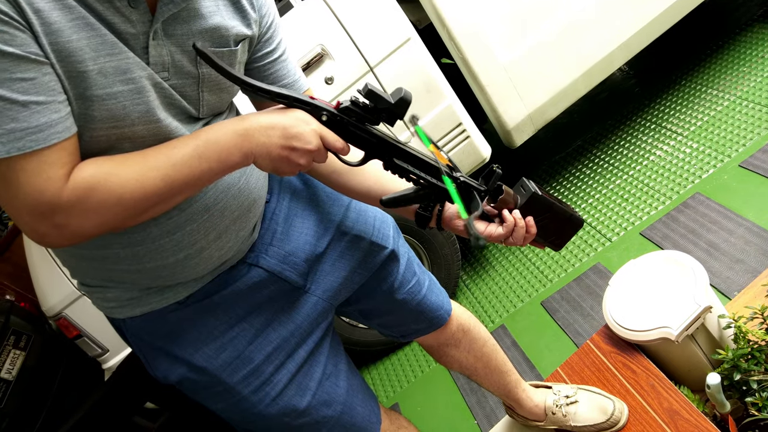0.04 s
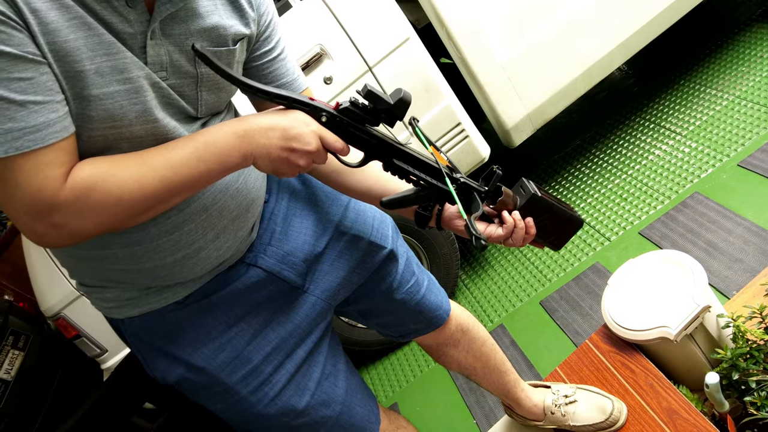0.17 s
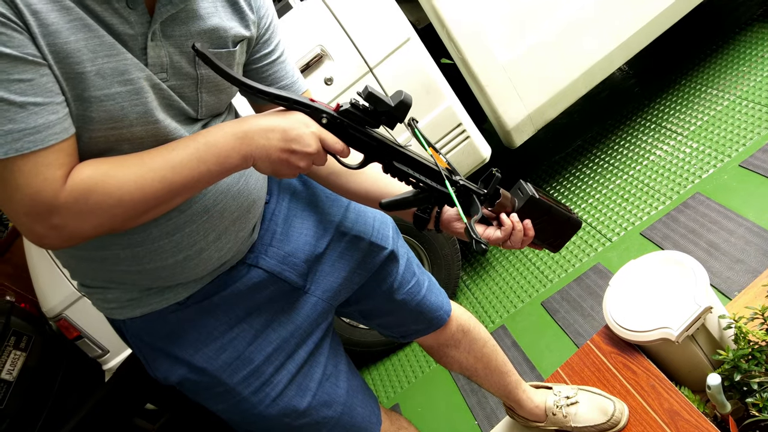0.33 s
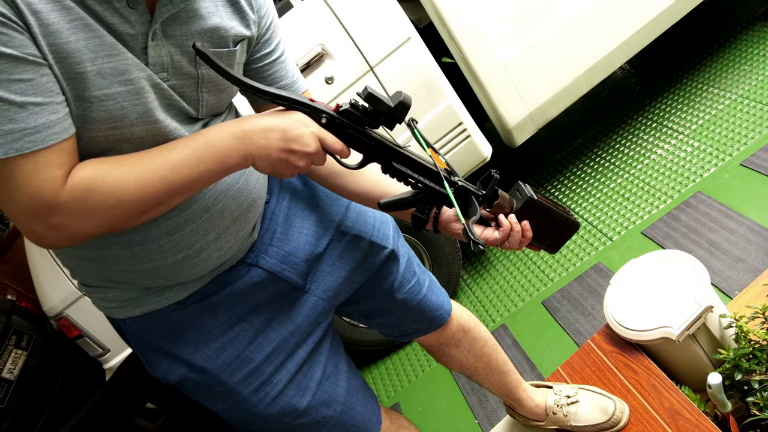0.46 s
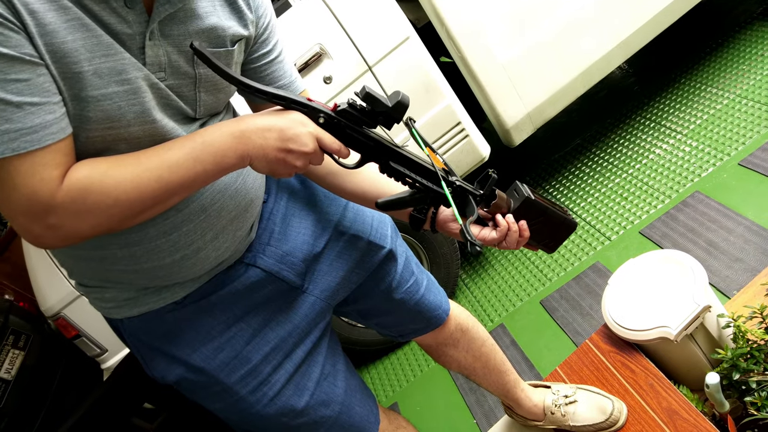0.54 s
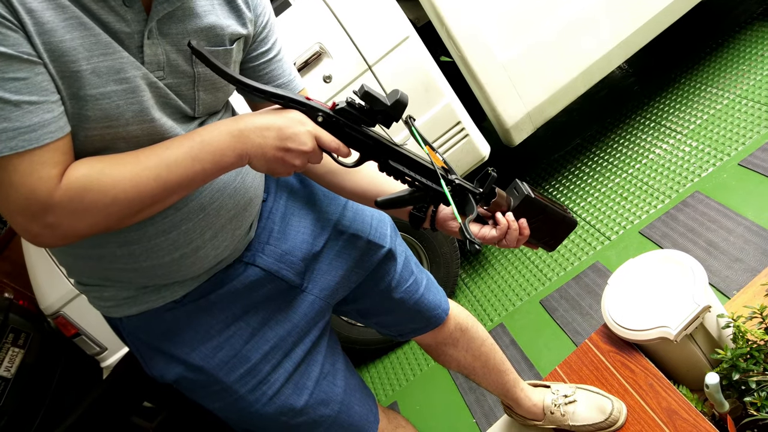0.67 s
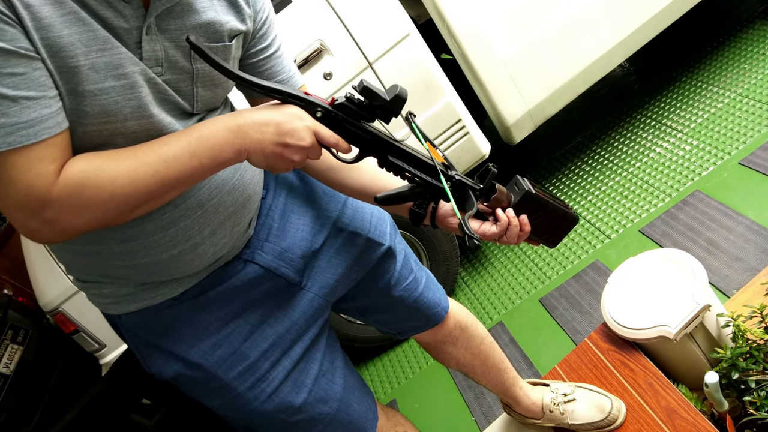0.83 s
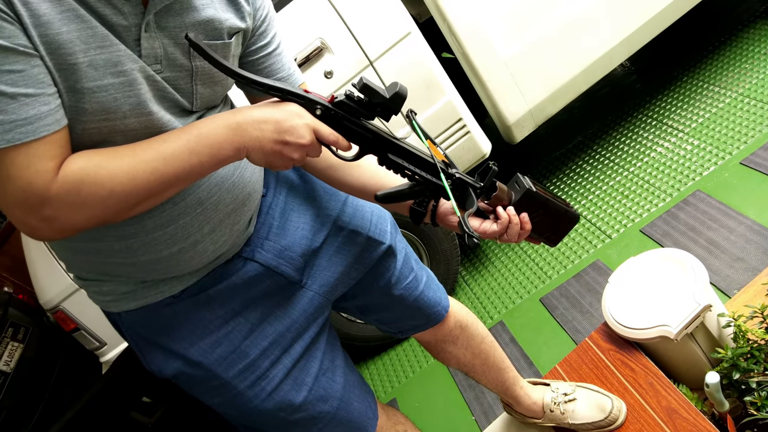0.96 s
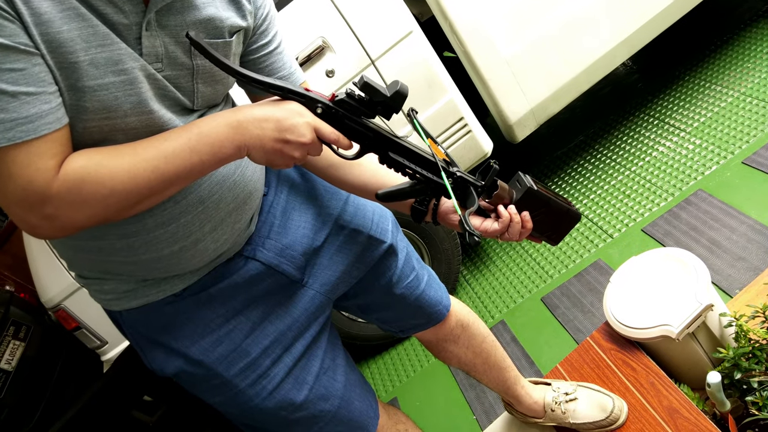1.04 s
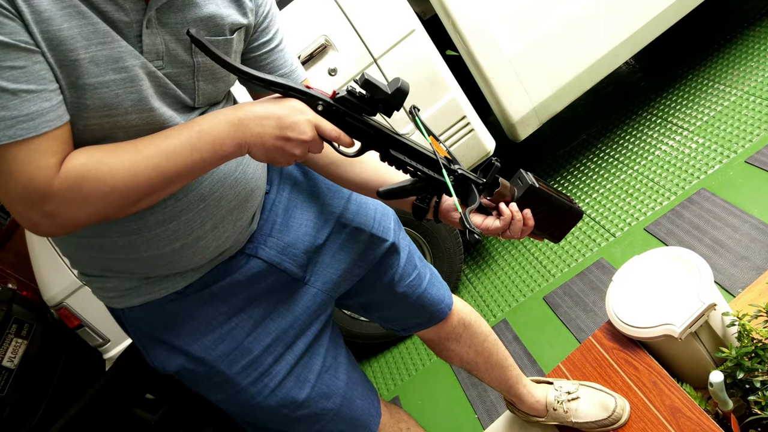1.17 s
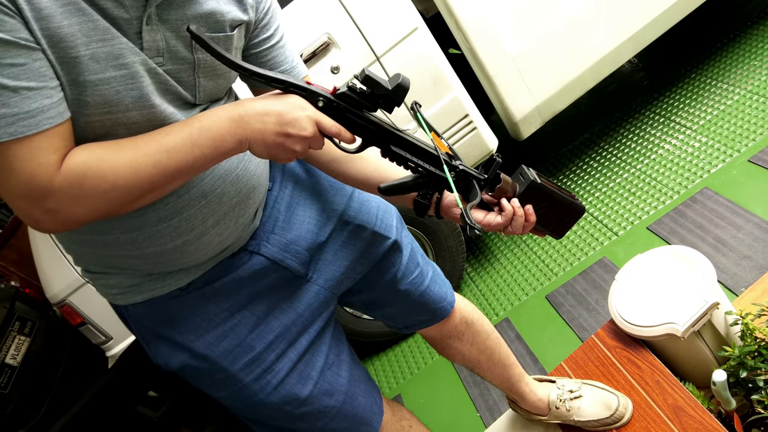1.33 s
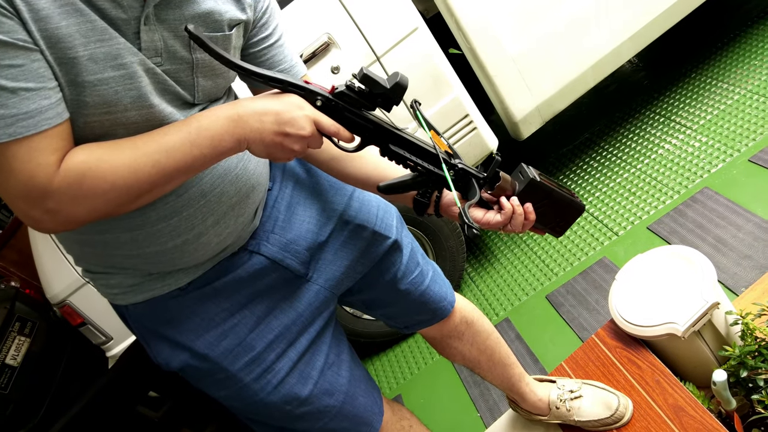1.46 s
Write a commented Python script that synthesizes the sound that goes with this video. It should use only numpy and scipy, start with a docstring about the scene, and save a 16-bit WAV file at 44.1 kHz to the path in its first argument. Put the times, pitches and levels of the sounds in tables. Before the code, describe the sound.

One close crossbow shot snaps and rings briefly in a small, faintly humming room.

```python
"""Ventilation hums and hisses in a small hard room. Then a crossbow fires once, close up:
the latch snaps, setting the frame ringing, and the string slams home. The limbs thump, metal sings,
the stock kicks back and loose fittings rattle, while the room adds a bright tail.
The bang ducks an automatic gain control, which holds, then slowly lets the ventilation back up."""
import sys
import numpy as np
from scipy import signal
from scipy.fft import irfft
from scipy.io import wavfile
from scipy.ndimage import uniform_filter1d, minimum_filter1d

SR = 44100
rng = np.random.default_rng(int(sys.argv[2]) if len(sys.argv) > 2 else 0)


def wav_out(sig):
    """Save sig, one row per channel (or a flat mono array), as 16-bit PCM at SR to the path in sys.argv[1]."""
    wavfile.write(sys.argv[1], SR, np.round(np.clip(np.atleast_2d(sig).T, -1, 1) * 32767).astype(np.int16))


N = 66150

# tone of the moving air, before its bass roll-off: (frequency [Hz], relative level [dB])
HISS_COLOUR = [(15, -63), (25, -42), (126, -5), (164, 4), (204, -3), (305, -2.5), (410, -8.5), (445, -16.5),
               (582, -13.5), (684, -18), (1140, -18.5), (1270, -19), (8130, -24.5), (10100, -36.5),
               (15500, -50)]
# fader ride on the hiss: (time [s], level [dB])
HISS_RIDE = [(0, -46.5), (.45, -44), (.6, -45.5), (.725, -46), (.745, -42.5), (.95, -45.5), (1.2, -45.5),
             (1.5, -47)]
# low resonances of the ventilation: (frequency [Hz], half-width [Hz], relative level [dB])
RUMBLE_BANDS = [(83, 21, -9.5), (127, 10.7, -3.5), (156, 16, -5)]
# fader ride on the rumble: (time [s], level [dB])
RUMBLE_RIDE = [(0, -50), (.4, -51), (.68, -52), (.8, -43.5), (1.0, -51.5), (1.2, -49), (1.5, -51.5)]
# duct resonances: (frequency [Hz], half-width [Hz], relative level [dB])
HUM_BANDS = [(250, 26, -5.5), (293.3, 16, -3), (318.3, 6.2, -4), (385, 74, -6.5), (577.4, 12.5, -15)]
# fader ride on the hum: (time [s], level [dB])
HUM_RIDE = [(0, -46), (.4, -51.5), (.7, -51), (.98, -46), (1.12, -47), (1.35, -46), (1.46, -45)]
# broad midrange rush of air: (frequency [Hz], half-width [Hz], relative level [dB])
RUSH_BANDS = [(1100, 730, 1), (1860, 550, -0.5)]
# fader ride on the rush: (time [s], level [dB])
RUSH_RIDE = [(0, -56.5), (.45, -60), (.8, -60), (1.1, -55.5), (1.5, -58)]
# clicks of the latch and loose fittings: (time [s], relative level [dB], t60 [s])
LATCH_HITS = [(.1415, -7, 0.0029), (.1425, 4, 0.0057), (.1445, -11, 0.0068), (.166, -7, 0.0068),
              (.175, -3, 0.028), (.184, 0, 0.013)]
# tone of a click: (frequency [Hz], relative level [dB])
LATCH_COLOUR = [(300, -15), (2500, -13), (4000, -4.5), (7500, -3.5), (9500, -10), (12000, -11),
                (15500, -18)]
# tone of the ringing frame: (frequency [Hz], relative level [dB])
FRAME_COLOUR = [(300, -9), (1500, -11), (3000, -8), (4000, 3.5), (6000, -3), (8200, 4), (9800, -3),
                (13500, -8.5), (15500, -11)]
# the room's reverb: (frequency [Hz], relative level [dB], t60 [s])
ROOM_TAIL = [(60, -24, 0.16), (200, -0.5, 0.36), (467, -3.5, 0.3), (1000, -6.5, 0.29), (1460, -11, 0.29),
             (1880, -4.5, 0.56), (2860, -4.5, 0.42), (3760, -4, 0.59), (5900, -1.5, .52), (8200, 0.5, 0.54),
             (9460, -8, 0.51), (11860, -15.5, 0.48), (15500, -21, 0.35)]
# string, limbs and bolt striking the frame: (time [s], relative level [dB], t60 [s])
SLAM_HITS = [(.1435, 1.5, 0.013), (.1453, 1, 0.026), (.1478, 0, 0.029), (.1515, -4, 0.067),
             (.156, -8, 0.06)]
# tone of those blows: (frequency [Hz], relative level [dB])
SLAM_COLOUR = [(40, -30), (100, -12), (250, 1), (500, -7), (750, -3.5), (1300, 2.5), (2700, -0.5),
               (4500, -12), (9000, -15.5), (15500, -11)]
# modes of limbs and stock: (frequency [Hz], relative level [dB], t60 [s], attack [s])
LIMB_TONES = [(129, -18.5, .15, 0.0039), (286.4, -15.5, .11, .004), (383, -24.5, 0.14, .003),
              (411.2, -18.5, 0.1, 0.0027)]
# modes of rail and metal fittings: (frequency [Hz], relative level [dB], t60 [s])
METAL_TONES = [(666.5, -20, 0.067), (730, -17, 0.114), (1146, -14.5, 0.07), (1803, -17, 0.13),
               (1937, -33, 0.44), (2053, -33.5, 0.6), (2400, -17.5, 0.1), (2806, -14.5, 0.1),
               (3540, -10.5, 0.074), (3847, -23.5, 0.27), (5590, -23.5, 0.34), (6888, -20.5, 0.35),
               (7870, -25, .27), (7953, -15.5, 0.31), (8109, -22, 0.51)]

LATCH_S, SLAM_S, RECOIL_S = .1415, SLAM_HITS[0][0], .154
TIME = np.arange(N) / SR


def undb(db):
    """Decibels to gain."""
    return 10 ** (np.asarray(db) / 20)


def noise(gain):
    """Noise of rms 1 whose spectrum follows gain(Hz)."""
    hz = np.maximum(np.arange(N // 2 + 1) * SR / N, 1)
    wave = irfft(gain(hz) * np.exp(2j * np.pi * rng.random(len(hz))), N)
    return wave / np.sqrt(np.mean(wave ** 2))


def along(points, hz, column=1):
    """Read a table's column on a log-frequency axis."""
    table = np.array(points, float)
    return np.interp(np.log(hz), np.log(table[:, 0]), table[:, column])


def fade(start, t60, attack=0):
    """Envelope that builds from start and dies away; all in seconds."""
    age = np.maximum(TIME - start, 0)
    return (1 - np.exp(-age / max(attack, 4 / SR))) * np.exp(-np.log(1000) * age / t60)


def ride(points):
    """Gain over time along a fader ride."""
    return undb(np.interp(TIME, *np.array(points).T))


def drone(bands):
    """Airflow noise ringing in resonances."""
    return sum(undb(db) * noise(lambda hz: 1 / (1 + ((hz / peak - peak / hz) * peak / (2 * width)) ** 2))
               for peak, width, db in bands)


def ventilation(roll_off_hz=604):
    """The bed: moving air hisses over a rumble, a duct hum and a rush, each swelling on its own."""
    hiss = ride(HISS_RIDE) * noise(lambda hz: undb(along(HISS_COLOUR, hz)) * hz / np.hypot(hz, roll_off_hz))
    rumble = ride(RUMBLE_RIDE) * drone(RUMBLE_BANDS)
    hum = ride(HUM_RIDE) * drone(HUM_BANDS)
    rush = ride(RUSH_RIDE) * drone(RUSH_BANDS)
    return hiss + rumble + hum + rush


def cracks(hits, colour):
    """Hard parts collide: each hit is a short noise burst of the same colour."""
    power = sum((undb(db) * fade(start, t60)) ** 2 for start, db, t60 in hits)
    return noise(lambda hz: undb(along(colour, hz))) * np.sqrt(power)


def frame_ring():
    """The frame rings so densely that it reads as bright noise."""
    return noise(lambda hz: undb(along(FRAME_COLOUR, hz))) * fade(LATCH_S, t60=.29, attack=.0033)


def room_tail():
    """Hard walls smear the bang into a diffuse tail; every band dies at its own rate."""
    edges_hz = np.geomspace(40, 16000, 36)
    tail, power = 0, 0
    for low, high in zip(edges_hz, edges_hz[1:]):
        centre = np.sqrt(low * high)
        gain = undb(along(ROOM_TAIL, centre)) * np.sqrt(high - low)
        envelope = fade(LATCH_S, t60=along(ROOM_TAIL, centre, column=2), attack=.0054)
        tail += gain * noise(lambda hz: (hz >= low) & (hz < high)) * envelope
        power += gain ** 2
    return tail / np.sqrt(power)


def struck_modes(tones):
    """The string's first blow starts decaying sines, alternating in polarity."""
    return sum((-1) ** k * undb(db) * fade(SLAM_S, t60, attack) * np.sin(2 * np.pi * hz * (TIME - SLAM_S))
               for k, (hz, db, t60, attack) in enumerate(tones))


def metal_ring(attack_s=.0014):
    """Rail and fittings sing under the blow, all with the same fast attack."""
    return struck_modes([(*tone, attack_s) for tone in METAL_TONES])


def limb_thump(start_hz=245.6, sag_s=.0424):
    """The limbs swing out with a thump whose pitch dives as their tension goes."""
    age = np.maximum(TIME - SLAM_S, 0)
    cycles = start_hz * sag_s * (1 - np.exp(-age / sag_s))
    return fade(SLAM_S, t60=.055, attack=.01) * np.sin(2 * np.pi * cycles)


def recoil(hz=62.6):
    """The stock kicks back with a short bass punch."""
    return fade(RECOIL_S, t60=.048, attack=.025) * np.sin(2 * np.pi * hz * (TIME - RECOIL_S))


def scene():
    """Mono mix of the ventilation bed, the shot and its tail."""
    bed = ventilation()
    latch = undb(-1.5) * cracks(LATCH_HITS, LATCH_COLOUR)
    wash = undb(-3.5) * frame_ring() + undb(-11) * room_tail()
    slam = undb(-1.5) * cracks(SLAM_HITS, SLAM_COLOUR)
    body = undb(3.5) * struck_modes(LIMB_TONES) + undb(4) * metal_ring()
    weight = undb(6.5) * limb_thump() + undb(3.5) * recoil()
    return (bed + latch + wash + slam + body + weight)[None]


def gain_control(x, threshold_db=-10.5, hold_s=.33, release_db_per_s=12):
    """The gain ducks at once above the threshold, holds, then climbs back at a steady rate."""
    power = uniform_filter1d(x ** 2, size=600)
    duck_db = np.minimum(0, threshold_db - 10 * np.log10(np.maximum(power, 1e-12)))
    half_hold = int(hold_s * SR / 2)
    held_db = minimum_filter1d(duck_db, 2 * half_hold + 1, origin=half_hold, mode="nearest")
    climb_db = release_db_per_s * TIME
    return x * undb(np.minimum.accumulate(held_db - climb_db) + climb_db)


def record(dry):
    """Master chain: gain control, soft clipping, a bass cut and a steep top cut."""
    ceiling, bass_cut_hz, top_cut_hz = .8, 26, 15450
    clipped = ceiling * np.tanh(gain_control(dry[0]) / ceiling)
    tight = signal.sosfilt(signal.butter(2, bass_cut_hz, "highpass", fs=SR, output="sos"), clipped)
    return signal.sosfilt(signal.ellip(10, .2, 70, top_cut_hz, fs=SR, output="sos"), tight)[None]


dry = scene()
out = record(dry)
wav_out(out)
```